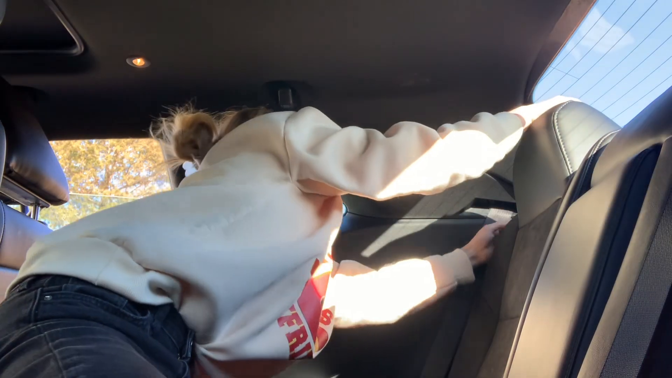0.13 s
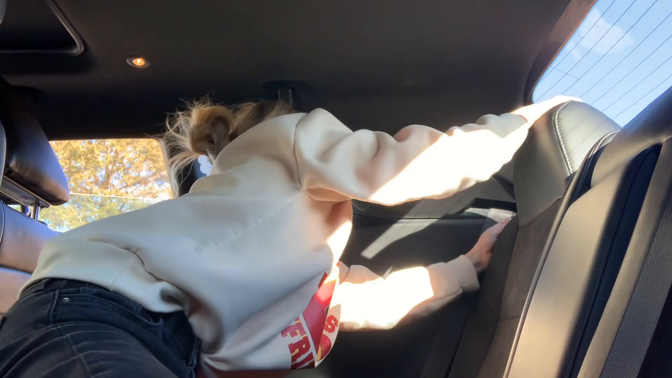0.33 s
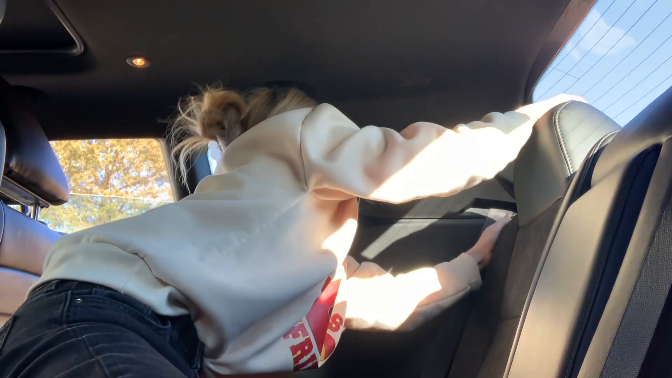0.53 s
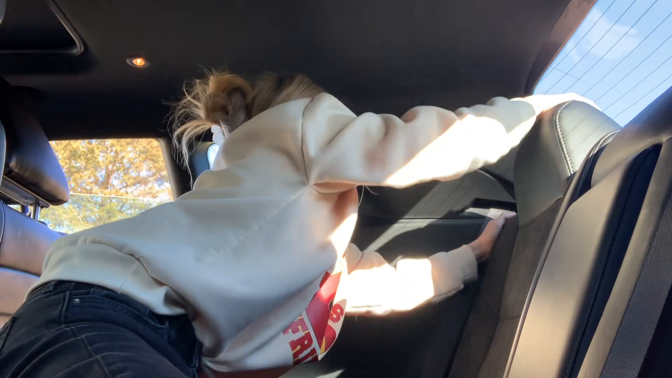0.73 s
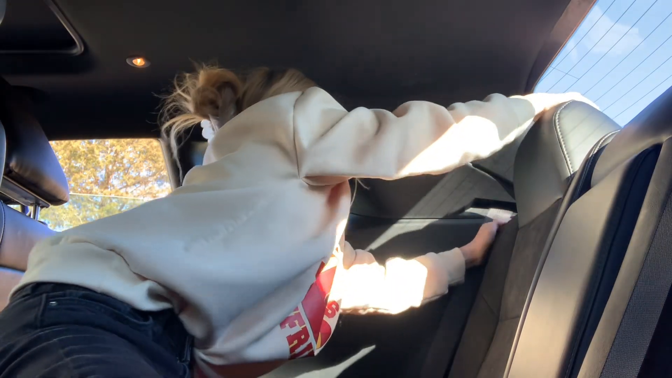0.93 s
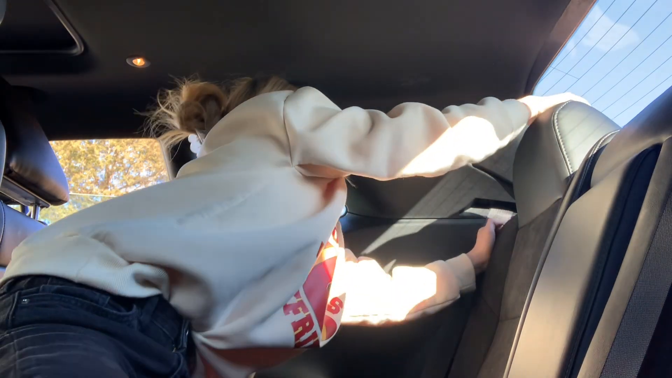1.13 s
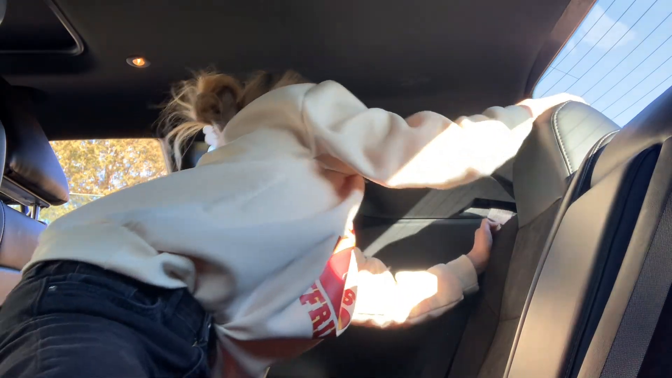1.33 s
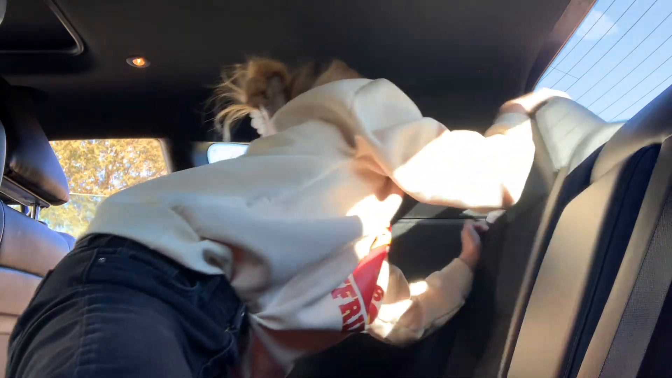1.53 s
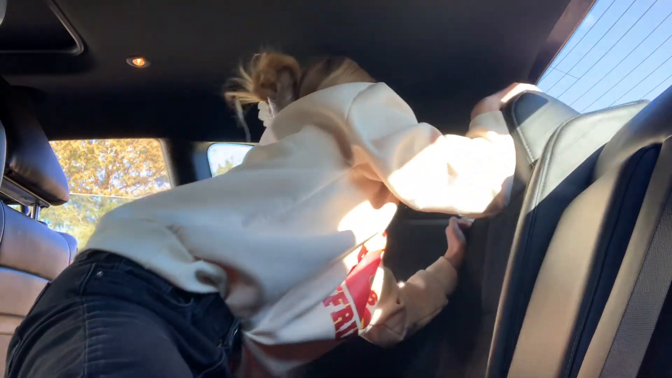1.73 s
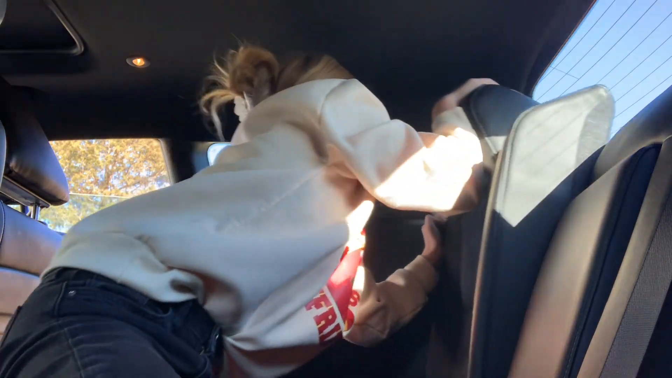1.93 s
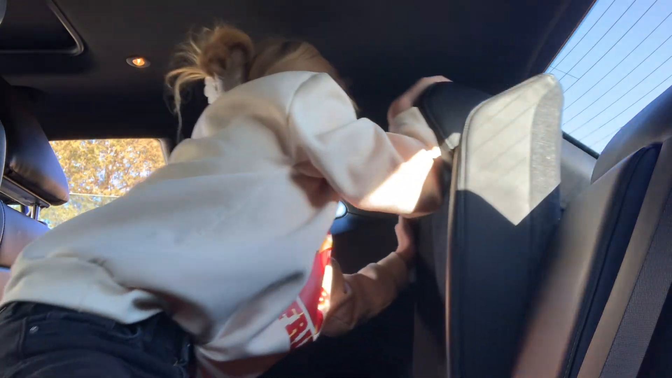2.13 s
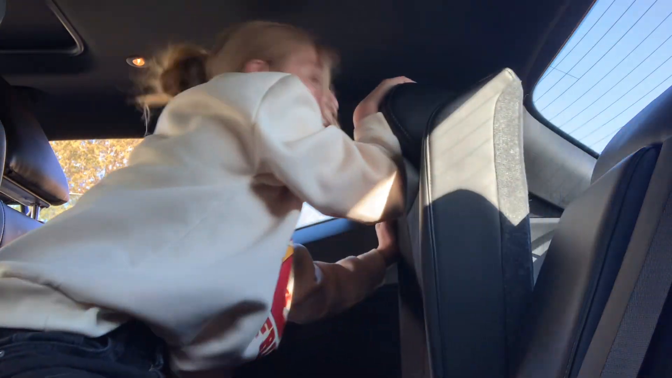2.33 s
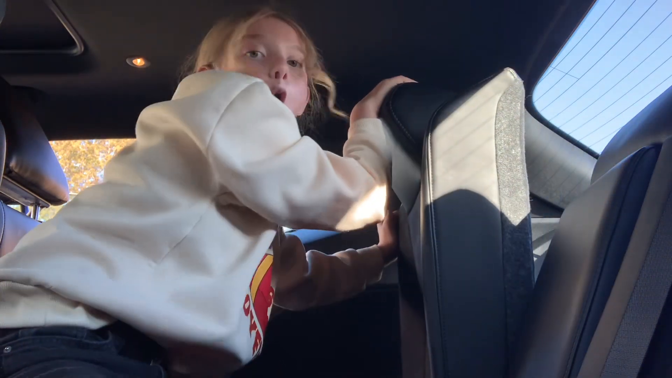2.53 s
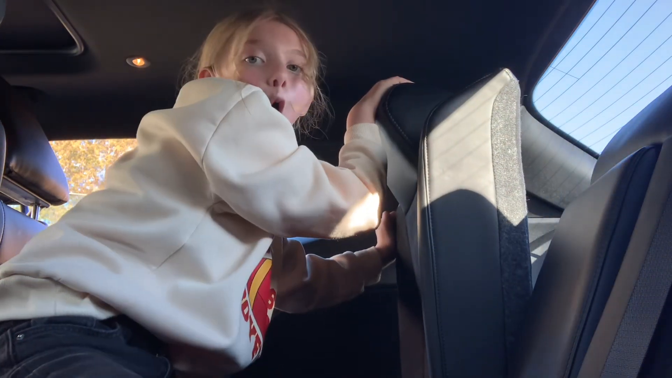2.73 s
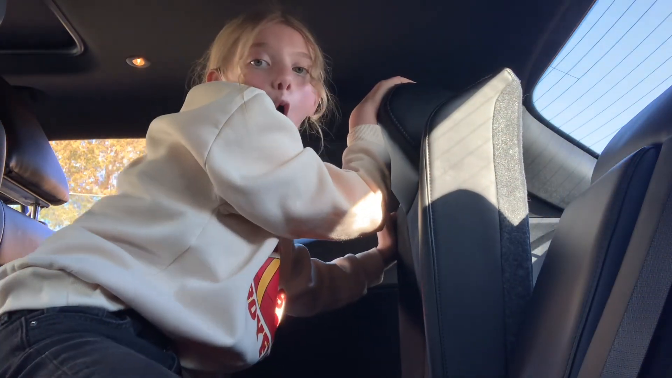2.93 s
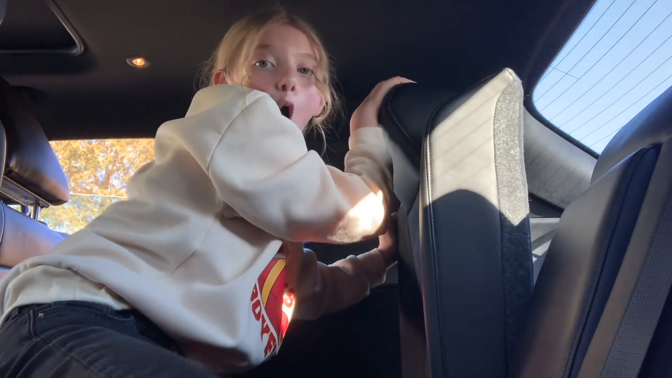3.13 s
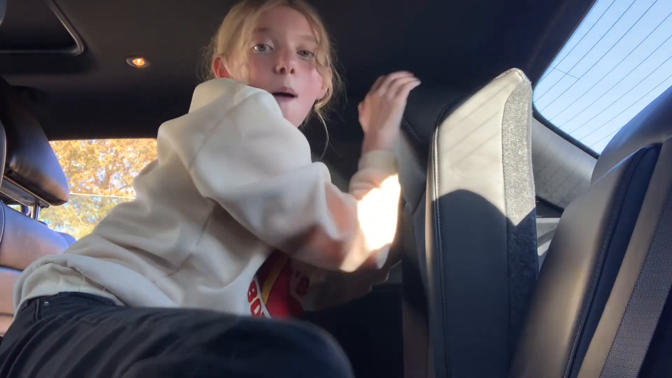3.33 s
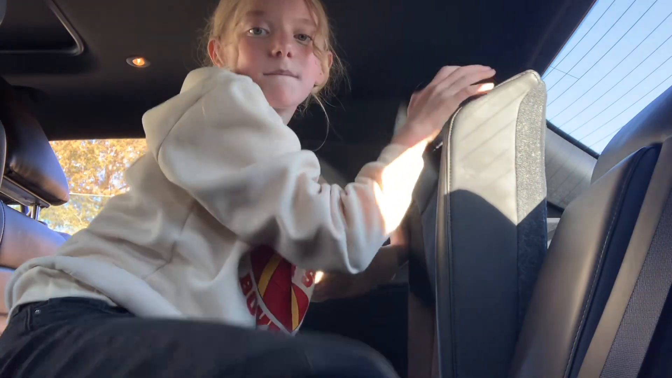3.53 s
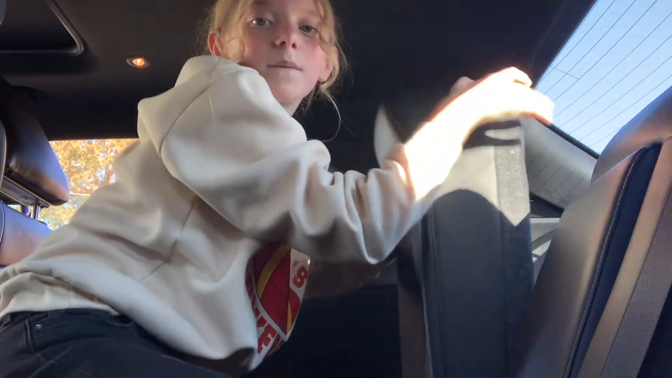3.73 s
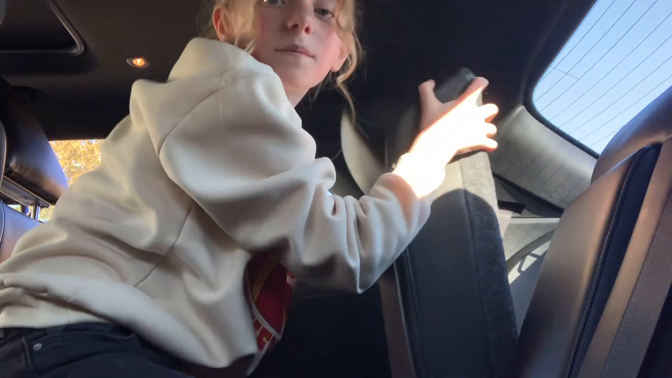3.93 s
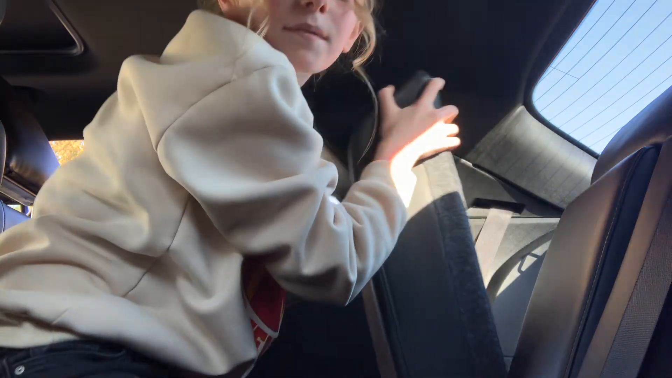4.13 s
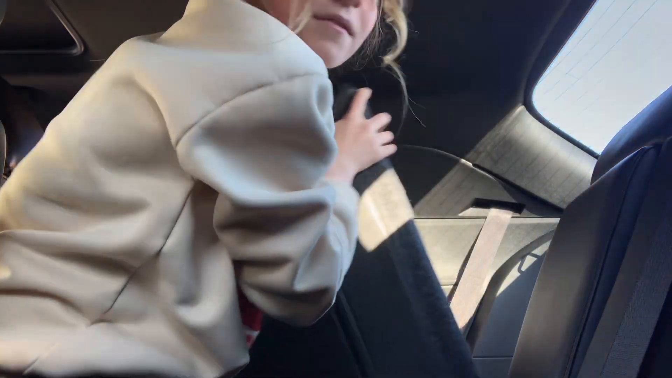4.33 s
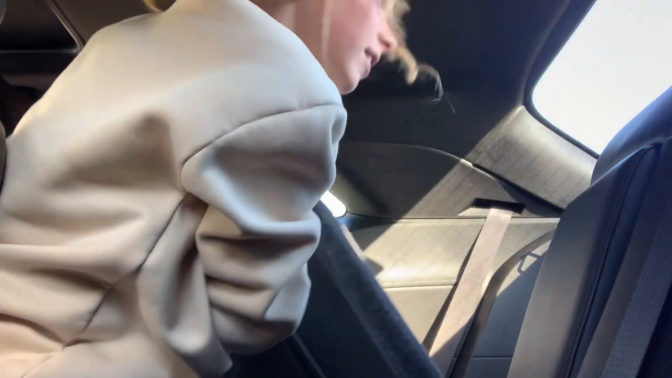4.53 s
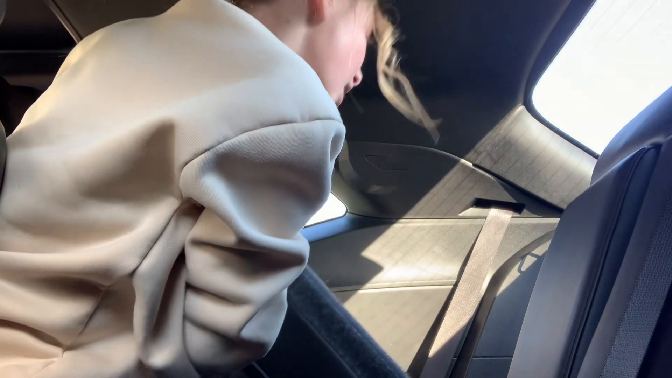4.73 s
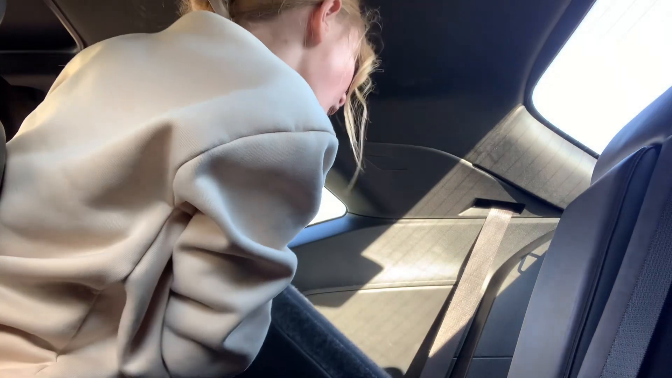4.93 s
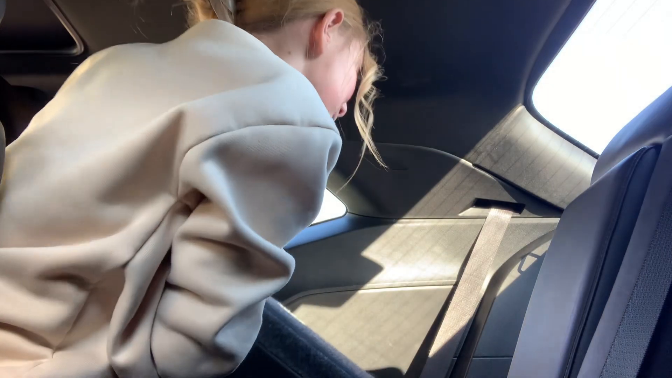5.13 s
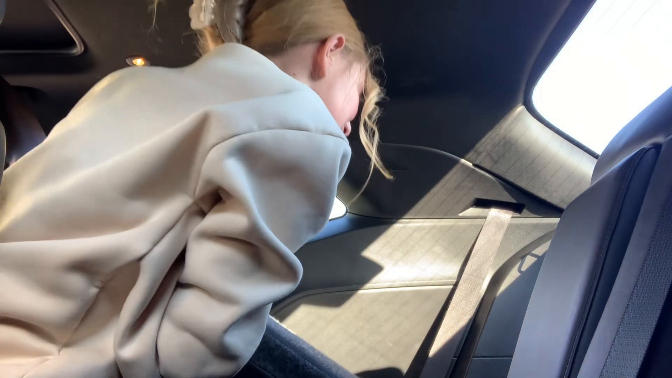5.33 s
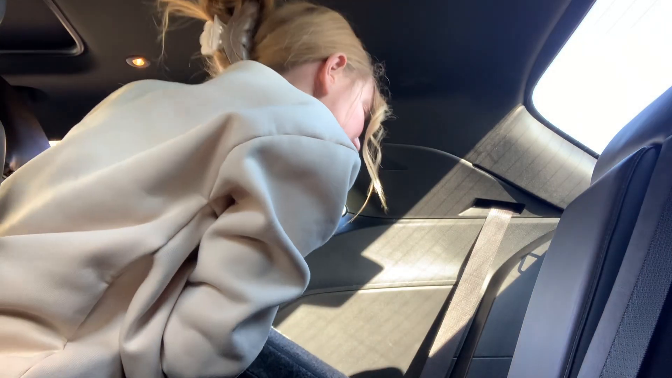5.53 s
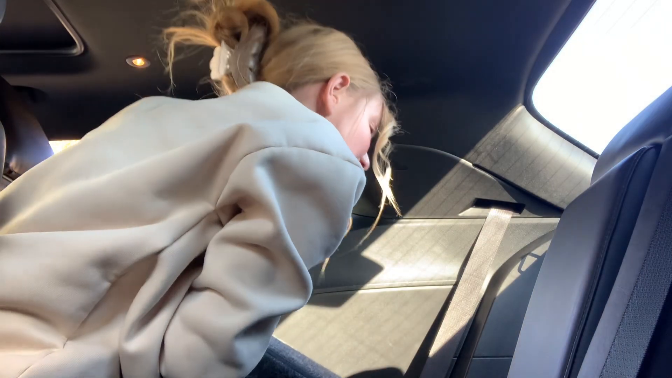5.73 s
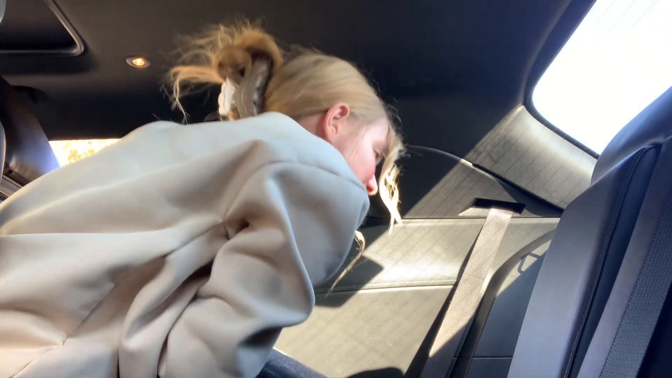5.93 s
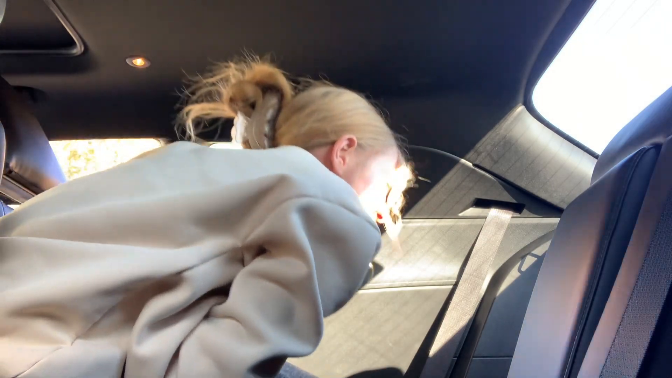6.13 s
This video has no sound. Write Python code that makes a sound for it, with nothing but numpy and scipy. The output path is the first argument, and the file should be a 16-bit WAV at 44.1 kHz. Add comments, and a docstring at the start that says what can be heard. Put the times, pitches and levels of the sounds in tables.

```python
"""A folding seatback is tugged, released and pushed down by hand inside a parked car.
The frame and its latch answer each blow with decaying modes, a thump of the cabin or a crack of noise.
Shifts of weight boom in the cabin modes; upholstery rubs and cloth swishes as shaped noise, cloth
crinkles in short snaps, and squeaks are wavering tones. Outside noise and a faint hum lie beneath.
The sound is widened to stereo by a fixed phase filter."""
import sys
import numpy as np
from scipy import signal
from scipy.fft import rfft, irfft, next_fast_len
from scipy.io import wavfile

SR = 44100
rng = np.random.default_rng(int(sys.argv[2]) if len(sys.argv) > 2 else 0)


def level_to_linear(level):
    """Convert decibel levels to linear amplitude factors, elementwise."""
    exponent = np.asarray(level, float) / 20
    return 10 ** exponent


def dump_mix(stems):
    """Bounce the given channels to the path in sys.argv[1] as a 16-bit WAV at rate SR."""
    frames = np.atleast_2d(stems).T  # one column per channel
    limited = np.clip(frames, -1, 1)  # hard clip at full scale
    pcm = np.round(limited * 32767).astype(np.int16)
    wavfile.write(sys.argv[1], SR, pcm)


N = 272978  # length in samples


def at_hz(rows, hz):
    """Interpolation on a logarithmic axis: reads a table of values against frequency."""
    rows = np.array(rows)
    return np.interp(np.log(hz + 1e-9), np.log(rows[:, 0]), rows[:, 1])


def rms_one(x):
    """Power normalisation: scales a signal to unit rms."""
    return x / np.sqrt(np.mean(x ** 2) + 1e-20)


def drift(rate_hz):
    """Low-passed noise: a slow random wander of spread 1, from two equal poles at rate_hz."""
    step = 40  # samples between computed points
    r = np.exp(-2 * np.pi * rate_hz * step / SR)
    settle = 2000
    noise = rng.standard_normal(N // step + settle + 2)
    slow = signal.lfilter([1], [1, -2 * r, r * r], noise)[settle:]
    return np.interp(np.arange(N) / step, np.arange(len(slow)), rms_one(slow))


def ring(force, hz, t60):
    """Damped resonance: a unit click sets a sine of height 1 ringing, down 60 dB after t60 seconds."""
    r, w = level_to_linear(-60 / (t60 * SR)), 2 * np.pi * hz / SR
    return signal.lfilter([0, np.sin(w)], [1, -2 * r * np.cos(w), r * r], force + 1e-18)


def dying(clicks, t60):
    """Exponential decay: an envelope jumps at each click and falls 60 dB in t60 seconds."""
    return signal.lfilter([1], [1, -level_to_linear(-60 / (t60 * SR))], clicks + 1e-18)


def clicks_at(times, db):
    """Impulse excitation: single-sample clicks at the given seconds."""
    out = np.zeros(N)
    place = np.clip(np.round(times * SR).astype(int), 0, N - 1)
    np.add.at(out, place, level_to_linear(db))
    return out


def coloured(spectrum):
    """Spectral shaping: two rows of noise (direct, scattered), closed at both ends, joint rms 1."""
    hz = np.arange(N // 2 + 1) * SR / N
    low_end = 1 / (1 + (spectrum[0][0] / (hz + 1)) ** 4)
    high_end = 1 / (1 + (hz / spectrum[-1][0]) ** 24)
    white = rfft(rng.standard_normal((2, N)))
    return rms_one(irfft(white * level_to_linear(at_hz(spectrum, hz)) * low_end * high_end, N))


def gestures(s, held, fade, db, rise_db_per_s, resting_db):
    """Addition of powers: gestures rise up to time s, hold, fade 20 dB per fade, over a resting level."""
    step = 32  # samples between computed points
    since = np.arange(0, N, step) / SR - s[:, None]
    rise = rise_db_per_s * np.minimum(since, 0)
    fall = 20 * np.maximum(since - held[:, None], 0) / fade[:, None]
    shape = db[:, None] + rise - fall
    total = 10 * np.log10(np.sum(level_to_linear(2 * shape), axis=0) + level_to_linear(2 * resting_db))
    return np.interp(np.arange(N) / step, np.arange(len(total)), total)


# Spectrum of the still cabin. Each row: frequency in Hz, relative level in dB per Hz.
STILL_CABIN = [(55, 5), (85, 23), (180, -5.5), (260, -30), (450, -22), (900, -28.5), (1800, -25.5),
               (8000, -59.5), (14500, -30.5)]
QUIET_DB, HUM_HZ, HUM_DB = -67, 120.81, -63


def quiet():
    """Transmission through a shell: traffic and air as shaped noise, with a faint, nearly steady hum."""
    tone = np.sin(2 * np.pi * HUM_HZ * np.arange(N) / SR)
    hum = level_to_linear(HUM_DB + 0.5 * drift(5.2)) * tone
    return level_to_linear(QUIET_DB) * coloured(STILL_CABIN) + hum * [[1], [0]]


# Modes of cabin and floor pan. Each row: frequency in Hz, relative level in dB, decay t60 in seconds.
CABIN_MODES = [(38.748, -17, 0.5993), (55.168, -15.5, 0.5357), (72.678, -7, 0.35976), (101.77, -2, 0.07224),
               (118.07, -17.5, 0.19206), (165.71, -31.5, 0.2)]


def ring_cabin(force):
    """Modal superposition: one force drives all cabin and floor modes."""
    return sum(level_to_linear(db) * ring(force, hz, t60) for hz, db, t60 in CABIN_MODES)


# Weight coming down on seat or floor. Each row: time of full level in seconds, boom level in dB,
# seconds to fade 20 dB.
WEIGHT_SHIFTS = [(0.0, -31.5, 0.1435), (0.33, -48, 0.5079), (0.499, -41.5, 0.1587), (0.779, -51, 1),
                 (1.139, -44, 0.6526), (1.25, -41, 0.0216), (1.62, -40, .5), (2.08, -50.5, 0.4575),
                 (2.33, -53.5, 0.7706), (3.228, -53.5, 0.1613), (3.48, -42.5, 0.2893), (3.62, -46.5, .5),
                 (4.02, -50.5, 0.6544), (4.7, -51.5, 1.1936), (4.87, -53, 0.5608), (5.63, -49.5, 0.8462)]


def boom():
    """Forced vibration: lumpy pushes on seat and floor shake the cabin modes."""
    s, weight_db, fade = np.transpose(WEIGHT_SHIFTS)
    boom_db = gestures(s, 0 * s, fade, weight_db, rise_db_per_s=300.5, resting_db=-63.5)
    force = rng.standard_normal((2, N)) * level_to_linear(3.5123 * drift(42.0))
    return level_to_linear(boom_db) * rms_one(ring_cabin(force))


# Hands and sleeves sliding over the seat. Each row: time of full level in seconds, hold in seconds,
# seconds to fade 20 dB, cloth swish level in dB, upholstery rub level in dB.
HAND_STROKES = [(0.0, 0.12085, 0.33, -79.5, -78), (0.92, 0.1649, 0.42, -78, -77.5),
                (1.099, 0.06446, 0.1623, -72, -65.5), (1.33, 0.2024, 0.0044, -75.5, -69.5),
                (1.516, 0.09085, 0.0241, -55, -62), (1.63, 0.0866, 0.0234, -68.5, -66.5),
                (1.758, 0.2943, 0.2827, -58.5, -62), (2.15, 0.31644, 0.3885, -80, -73.5),
                (3.168, 0.09854, 0.1389, -65.5, -69), (3.45, 0.0647, 0.6182, -70, -71),
                (3.54, 0.08177, 0.1956, -64, -65), (3.698, 0.13519, 0.1143, -63, -62),
                (3.965, 0.02, 0.15, -75, -66), (4.21, 0.0302, 0.2966, -74.5, -75),
                (4.5, 0.0873, 1.5012, -73, -76), (4.72, .5, 0.1365, -75.5, -69),
                (4.93, 0.1401, 0.0221, -69.5, -71.5), (5.149, 0.04048, 0.1098, -64.5, -73.5),
                (5.271, 0.051855, 0.0147, -69, -71.5), (5.4, .05, 0.0999, -68.5, -72),
                (5.66, 0.03583, 0.1973, -72, -78.5), (5.8, 0.07451, 0.1574, -65.5, -70),
                (5.951, 0.13314, 0.051, -58.5, -69.5), (6.11, 0.0916, 12.2711, -61.5, -66.5)]


def stroke_levels():
    """Common excitation: each stroke drives rub and swish together; limbs are never quite still."""
    s, held, fade, swish, rubbing = np.transpose(HAND_STROKES)
    rise_db_per_s = 547.5
    rub_db = gestures(s, held, fade, rubbing, rise_db_per_s, resting_db=-81)
    swish_db = gestures(s, held, fade, swish, rise_db_per_s, resting_db=-85.5)
    return rub_db, swish_db


# Modes of the seat frame. Each row: frequency in Hz, relative level in dB, decay t60 in seconds.
FRAME_MODES = [(277, 8, 0.05), (385, 1, 0.04), (515, -6.5, 0.045), (740, -9, 0.05), (850, -11, 0.02),
               (1040, -10, 0.03), (1375, -9, 0.045), (1680, -12, 0.03), (2200, -9, 0.012),
               (3040, -10, 0.025), (4100, -13, .015)]


def ring_frame(force, emphasis_db, detune):
    """Modal superposition: a force drives all frame modes, each with its own emphasis and detuning."""
    modes = zip(FRAME_MODES, emphasis_db, detune)
    return sum(level_to_linear(db + extra) * ring(force, hz * (1 + shift), t60)
               for (hz, db, t60), extra, shift in modes)


# Spectrum of sliding upholstery. Each row: frequency in Hz, relative level in dB per Hz.
RUB_SPECTRUM = [(250, 2.5), (450, -3), (800, -6), (1900, -17), (3000, -11.5), (5000, -13)]


def rub(rub_db):
    """Stick-slip friction: upholstery slides in clumps and makes the frame hum along."""
    hiss = coloured(RUB_SPECTRUM) * level_to_linear(2.672 * drift(15.007))
    even = np.zeros(len(FRAME_MODES))
    frame = rms_one(ring_frame(hiss, even, even))
    return level_to_linear(rub_db) * rms_one(hiss + level_to_linear(-4.5) * frame)


# Spectrum of swishing cloth. Each row: frequency in Hz, relative level in dB per Hz.
CLOTH_SPECTRUM = [(1500, 0), (3000, -7.5), (5500, 4.5), (9500, 5.5), (12000, 1), (14000, -5), (15500, -17)]
# Stiff cloth buckling. Each row: time in seconds, level in dB of the snap's envelope at its onset.
CLOTH_BUCKLES = [(4.8172, -53), (5.005, -53), (5.0869, -51), (5.1469, -52), (5.1806, -48), (5.277, -50.5),
                 (5.303, -51), (5.343, -57), (5.3929, -54), (5.432, -49), (5.6596, -59), (5.68, -55),
                 (5.7616, -59), (5.836, -48), (5.889, -53), (5.937, -47.5), (5.9605, -49), (6.057, -46),
                 (6.1057, -46.5), (6.166, -48)]


def cloth(swish_db):
    """Friction noise and buckling: a swish, brighter when louder, and thin, short snaps."""
    s, db = np.transpose(CLOTH_BUCKLES)
    buckling = np.arange(N) > s[0] * SR
    # from the first buckle on, small ones come by chance, on average 200 per second
    chance = rng.random(N) < 200 / SR
    small_db = swish_db - 7 + 6 * np.minimum(rng.exponential(1, N), 2.4)
    small = buckling * chance * level_to_linear(small_db)
    bursts = dying(clicks_at(s, db), .02) + dying(small, .015)
    hiss = coloured(CLOTH_SPECTRUM)
    thin = signal.sosfilt(signal.butter(2, 4400, "high", fs=SR, output="sos"), hiss)
    top = signal.sosfilt(signal.butter(2, 10000, "high", fs=SR, output="sos"), hiss)
    treble_db = 0.7045 * np.clip(swish_db + 67.5, -30, 30)
    swish = hiss + (level_to_linear(treble_db) - 1) * top
    # the swish itself is a little weaker while the cloth buckles
    return swish * level_to_linear(swish_db - 2.673 * buckling + 0.9667 * drift(29.0)) + thin * bursts


# Knocks on the seat frame. Each row: start in seconds, relative level in dB, chatter t60 in seconds,
# favoured pitch in Hz, reach in octaves (where the emphasis is 6 dB down).
FRAME_BLOWS = [(0.304, -31, .045, 850, 1.05), (.348, -44, .04, 550, .9), (0.414, -48, .09, 500, .5),
               (0.454, -31, .055, 850, 1.05), (1.103, -53, .04, 450, .6), (1.138, -50, .05, 450, .7),
               (1.244, -39, .03, 520, .25), (1.477, -42.5, .12, 380, .7), (1.4915, -17, .035, 2300, .4),
               (1.494, -18, .06, 300, 1.05), (1.496, -16, .06, 1375, .15), (1.53, -33, .14, 650, 1.4),
               (3.466, -54, .08, 480, .9), (3.553, -42, .027, 600, .9), (3.948, -46, .3, 750, .15),
               (4.0062, -20, .025, 2700, .95), (4.01, -30, .04, 400, 1.1), (4.02, -43, .3, 515, .15),
               (5.846, -48, .08, 600, .9)]


def knocks():
    """Impact excitation of modes: chattering contacts strike the frame, favouring modes near one pitch."""
    since = np.arange(SR // 2) / SR
    out = np.zeros((2, N + SR))
    touches = rng.standard_normal((2, N + SR)) * [[1], [.6]]
    touches[:, :N] *= level_to_linear(3 * drift(200))  # uneven contacts
    mode_hz = np.array(FRAME_MODES)[:, 0]
    # each blow meets another spot and another load on the frame
    spots = rng.standard_normal((len(FRAME_BLOWS), 2, len(FRAME_MODES)))
    for (s, knock_db, chatter_s, favoured_hz, octaves), (louder_db, shifted) in zip(FRAME_BLOWS, spots):
        here = slice(int(s * SR), int(s * SR) + len(since))
        chatter = level_to_linear(knock_db - 60 * since / np.clip(chatter_s, .01, .3))
        swell = signal.lfilter([.008], [1, -.992], chatter)  # softens the onset
        reach_db = -6 * (np.log2(mode_hz / favoured_hz) / octaves) ** 2 + louder_db
        out[:, here] += ring_frame(touches[:, here] * swell, reach_db - 23.5, 0.012 * shifted)
    return out[:, :N]


# Bright cracks of the latch. Each row: time in seconds, relative level in dB.
LATCH_CRACKS = [(0.307, -53), (0.454, -43), (1.4911, -41.5), (3.444, -63), (4.0072, -37)]


def cracks():
    """Two-stage decay: each crack is bright noise with a fast fall and a weaker, slower tail."""
    band = signal.butter(3, [5200, 10500], "band", fs=SR, output="sos")
    bright = signal.sosfilt(band, rng.standard_normal((2, N)))
    onsets = clicks_at(*np.transpose(LATCH_CRACKS))
    envelope = dying(onsets, 0.015965) + level_to_linear(-14.5) * dying(onsets, 0.08676)
    return level_to_linear(4.5) * bright * envelope


# Soft pushes into the cushion. Each row: time in seconds, relative level in dB.
CUSHION_PUSHES = [(0.349, -41.5), (.474, -34.5), (.506, -40), (1.242, -41), (1.379, -37), (1.4905, -24),
                  (1.4969, -10), (1.532, -30.5), (4.017, -47), (4.164, -47.5), (4.859, -44.5), (5.844, -50)]


def pushes():
    """Impulse response of modes: a push and its rebound set the cabin ringing, in the direct sound only."""
    band = signal.butter(2, [60, 260], "band", fs=SR)
    push = -signal.lfilter(*band, clicks_at(*np.transpose(CUSHION_PUSHES)))
    return level_to_linear(3.5) * ring_cabin(push) * [[1], [0]]


# Hinge squeaks. Each row: start in seconds, length in seconds, mean pitch in Hz, level in dB before flutter.
HINGE_SQUEAKS = [(0.537, 0.075, 903.3, -73), (0.821, 0.08, 889.9, -72.5)]


def squeaks():
    """Stick-slip oscillation: short tones that waver in pitch and flutter in level, with a weak octave."""
    t, out = np.arange(N) / SR, np.zeros(N)
    waver = np.cumsum(1 + .02 * drift(90)) / SR
    for s, length, hz, db in HINGE_SQUEAKS:
        done = np.clip((t - s) / length, 0, 1)
        phase = 2 * np.pi * hz * waver
        tone = np.sin(phase) + level_to_linear(-13.0) * np.sin(2 * phase)
        out += level_to_linear(db) * np.sin(np.pi * done ** 0.7573) * tone
    return out * level_to_linear(2.5 * drift(70)) * [[1], [.4]]


def scene():
    """Linear superposition: row 0 sums the direct sound, row 1 what the cabin scatters."""
    rub_db, swish_db = stroke_levels()
    handling = boom() + rub(rub_db) + cloth(swish_db)
    impacts = knocks() + cracks() + pushes()
    return handling + impacts + squeaks() + quiet()


def low_pass(x):
    """Removes everything above the highest recorded frequency."""
    return signal.sosfilt(signal.butter(12, 16540, fs=SR, output="sos"), x)


# Phase between left and right. Each row: frequency in Hz, radians by which the left leads.
STEREO_PHASE = [(45, -1.1), (130, -1.5), (215, -2.9), (430, -5.1), (700, -9.6), (1210, -15.7),
                (1550, -13.8), (2050, -12.5), (2950, -16), (3400, -16.3), (4300, -10.5), (5800, -9.7),
                (6600, -6.6), (7600, -6.3), (9200, -3.2), (13200, 3.1), (14700, 6.2)]
# Likeness of left and right. Each row: frequency in Hz, share common to both.
STEREO_LIKENESS = [(40, 0.5399), (250, 0.964), (1200, 0.6448), (2800, 0.7069), (4500, 0.2217),
                   (9000, 0.9941)]


def record(dry):
    """Interchannel coherence: both sides share the direct sound, take opposite scattered parts; left turns phase."""
    size = next_fast_len(N + 4096)
    hz = np.arange(size // 2 + 1) * SR / size
    direct, scattered = rfft(dry, size)
    alike = np.clip(at_hz(STEREO_LIKENESS, hz), 0, 1)
    common = np.sqrt(1 + alike) * direct
    opposed = np.sqrt(1 - alike) * scattered
    right, left = common + opposed, common - opposed
    turned = left * np.exp(1j * at_hz(STEREO_PHASE, hz))
    stereo = irfft([turned, right], size)[:, :N]
    # the deepest bass is lost
    stereo = signal.sosfilt(signal.butter(2, 36, "high", fs=SR, output="sos"), stereo)
    return low_pass(stereo)


dry = scene()
out = record(dry)
dump_mix(out)
```